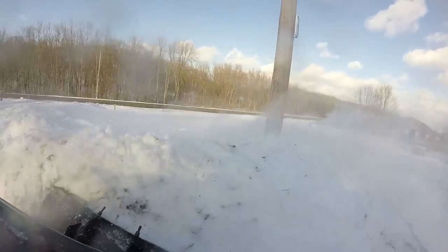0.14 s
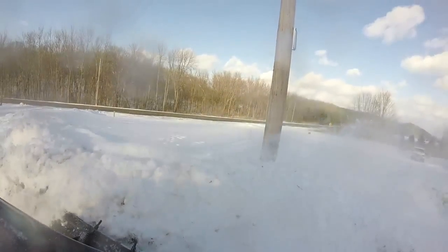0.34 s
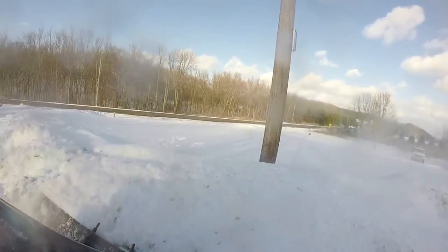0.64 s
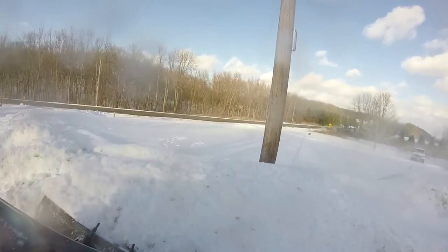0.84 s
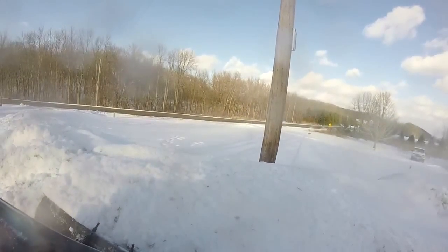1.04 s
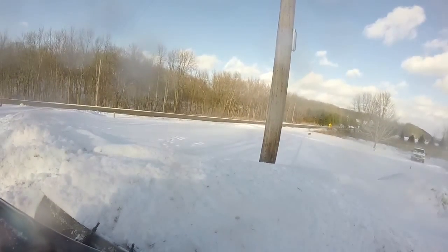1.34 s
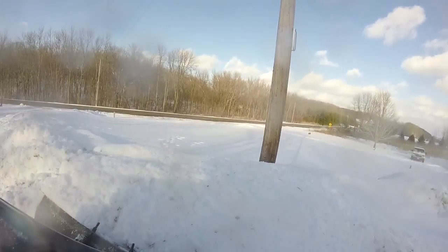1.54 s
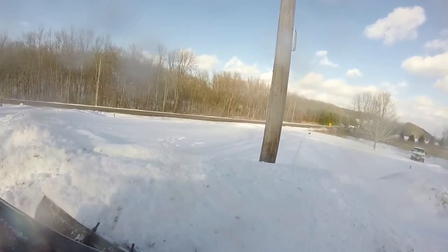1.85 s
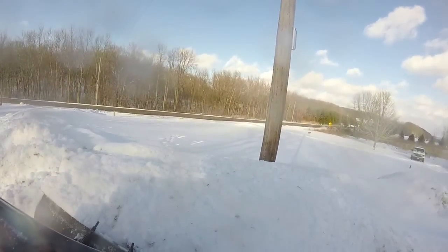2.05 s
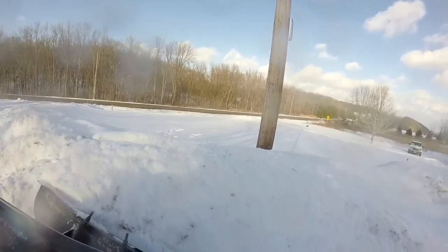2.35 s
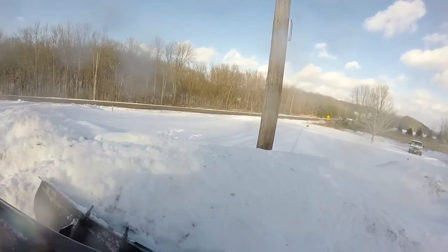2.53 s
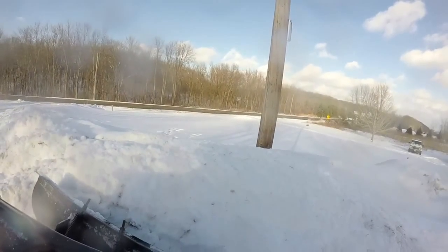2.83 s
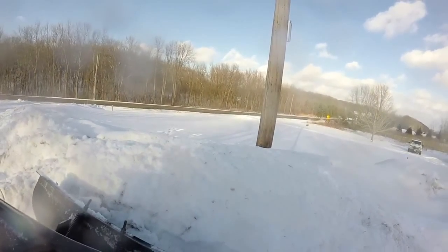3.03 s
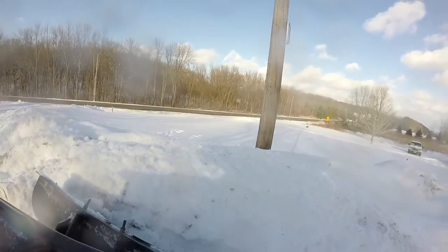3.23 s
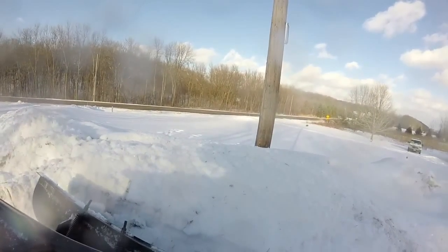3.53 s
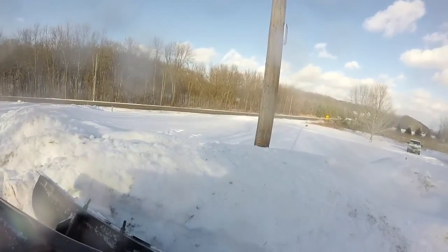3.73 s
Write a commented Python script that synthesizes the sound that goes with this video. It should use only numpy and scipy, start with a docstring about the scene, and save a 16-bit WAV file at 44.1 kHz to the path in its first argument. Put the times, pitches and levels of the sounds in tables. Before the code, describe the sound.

Close to a cased camera on a plow truck outdoors, a short metallic squeal and scrape give way to low engine rumble and small knocks, then a heavy rumbling scrape turns into rough, crackling ice grinding.

```python
"""A steel blade squeals at the end of one push of a plow truck, close to a cased camera on its hood.
The engine, sine orders over noise, sinks toward idle while grit and knocks ring the scuffing blade.
Then the blade bites down with a rumble of the frame and grinds on over icy pavement: random grains
crumble the ice, splinter bursts crack it and short pings chatter as the engine labours and picks up."""
import sys
import numpy as np
from scipy import signal
from scipy.fft import rfft, irfft
from scipy.io import wavfile
from scipy.ndimage import uniform_filter1d, minimum_filter1d

SR = 44100
rng = np.random.default_rng(int(sys.argv[2]) if len(sys.argv) > 2 else 0)


def transcribe(u):
    """Save the signal u as a 16-bit wav file named by the first command-line argument.

    u: samples, shape (n,) or (channels, n), limited to [-1, 1]; the rate is SR.
    q: integer samples, one column per channel.
    """
    v = np.clip(np.atleast_2d(u).T, -1, 1)
    q = np.round(v * 32767).astype(np.int16)
    wavfile.write(sys.argv[1], SR, q)


N = 171108
T = np.arange(N) / SR  # time, s

# All table levels are relative; spectra give the shape only, since each body has unit energy.
# resonances and notches of the camera case: centre_hz [Hz], half_width_hz [Hz], level_db [dB]
CASE_PEAKS = [(2490, 222, 7.5), (2920, 185, -7), (3290, 240, 0.5), (4034, 355, -10), (5630, 290, 6.5),
              (6090, 80, -7.5), (6860, 390, 8), (12900, 850, 17.5)]
# resonances of the steel blade: centre_hz [Hz], half_width_hz [Hz], level_db [dB]
BLADE_PEAKS = [(522, 16, 5), (675, 33, 5), (892, 6.5, 7), (1073, 48, 10), (1430, 94, 10), (1726, 97, 7),
               (2304, 85, -0.5), (2576, 55, 4)]
# spectrum of steel sliding on the ground: frequency_hz [Hz], density_db [dB per Hz]
SLIDE_SPECTRUM = [(100, -24.5), (230, -7.5), (350, -19), (560, 3), (1000, -1.5), (1400, -6), (2200, 2.5),
                  (3300, -8.5), (4700, -15), (6500, -40), (9000, -41.5), (13000, -105.5), (15500, -70)]
# spectrum of ice cracking: frequency_hz [Hz], density_db [dB per Hz]
ICE_SPECTRUM = [(100, -13.5), (350, -24.5), (560, -14), (900, -10.5), (1800, -1.5), (2500, -4.5),
                (3300, -1), (4650, -8.5), (6500, -25), (8000, -34.5), (10000, -40), (13000, -46),
                (15500, -65.5)]


def gain_of(db):
    """Decibels to gain."""
    return 10 ** (np.asarray(db) / 20)


def evened(x):
    """Scales to rms 1."""
    return x / np.sqrt(np.mean(x ** 2) + 1e-20)


def topped(x):
    """Scales the loudest instant, averaged over 64 samples, to rms 1."""
    return x / np.sqrt(uniform_filter1d(x ** 2, size=64).max() + 1e-20)


def curve(rows, axis=1):
    """One column of a timed table, drawn in straight lines to every sample."""
    rows = np.array(rows)
    return np.interp(T, rows[:, 0], rows[:, axis])


def drift(hz):
    """Smooth random motion of rms 1, with little left above the given rate."""
    f = np.fft.rfftfreq(N, 1 / SR)
    smooth = rfft(rng.standard_normal(N)) / (1 + (f / hz) ** 4)
    return evened(irfft(smooth, N))


def colour(x, spectrum, peaks=(), size=8192):
    """Rings x through a causal body of unit energy, made of a smooth spectrum and resonances."""
    f = np.fft.rfftfreq(size, 1 / SR)
    hz, db = np.transpose(spectrum)
    body_db = np.interp(np.log(f + 1), np.log(hz), db)
    body_db = body_db + sum(height * np.exp(-((f - centre) / width) ** 2) for centre, width, height in peaks)
    # minimum phase: the body starts to ring at once
    log_gain = np.log(gain_of(np.r_[body_db, body_db[-2:0:-1]]))
    ring = np.fft.ifft(np.exp(np.conj(signal.hilbert(log_gain)))).real[:size // 2]
    return signal.oaconvolve(x, ring / np.linalg.norm(ring))[:N]


def grains(per_s, spread_db, clump_db):
    """Random clicks of either sign and uneven size, whose size swells in clumps; rms 1."""
    clump_hz = 109
    clumps = clump_db * np.clip(drift(clump_hz), -2, 2)
    size_db = spread_db * np.minimum(rng.exponential(1, N), 3.5) + clumps
    clicks = rng.choice([-1, 1], N) * (rng.random(N) < per_s / SR)
    return evened(gain_of(size_db) * clicks)


def add(mix, s, sound):
    """Mixes a sound in at a time in seconds."""
    part = mix[round(s * SR):][:len(sound)]
    part += sound[:len(part)]


def swell(t, peak_s):
    """Envelope that rises to 1 at peak_s and dies away smoothly."""
    return t / peak_s * np.exp(1 - t / peak_s)


def ping(hz, ring_s):
    """A few cycles of steel that swell and die at once."""
    t = T[:SR // 100]
    return swell(t, ring_s) * np.sin(2 * np.pi * (hz * t + rng.random()))


def blow(rise_s, decay_s):
    """Time and envelope of a blow: a short rise, then a steady decay."""
    t = T[:SR // 5]
    return t, np.minimum(t / rise_s, 1) * np.exp(-np.maximum(t - rise_s, 0) / decay_s)


def engine():
    """Exhaust orders are multiples of the wandering firing rate, over the noise of the running truck."""
    # firing tone: start_s [s], firing_hz [Hz], firing_level_db [dB], octave_level_db [dB]
    firing = [(0, 48, -24, -43), (.25, 44.96, -35.5, -44.5), (.43, 45.04, -24, -45),
              (.756, 39.6, -18, -36.5), (.964, 41.1, -15, -40), (1.1, 38.25, -19, -36),
              (1.3, 38, -19, -35.5), (1.58, 38.4, -12, -38.5), (1.67, 39.36, -25, -29),
              (1.8, 40.67, -30, -25.5), (2.15, 42.45, -22.5, -35), (2.274, 50, -34, -37),
              (2.458, 43.04, -30.5, -29), (2.626, 41.82, -19, -20.5), (2.852, 48.74, -34.5, -36.5),
              (3.05, 51.1, -31.5, -30), (3.21, 42.8, -25.5, -31.5), (3.31, 43.16, -18, -25),
              (3.55, 50.27, -30.5, -28.5), (3.7, 55.36, -39, -32.5), (3.88, 66.3, -16, -35)]
    # higher engine orders: multiple [of the firing rate], level_db [dB against the octave]
    overtones = [(1.5, -8.5), (2.5, -15.5), (3, -10.5), (4, -19), (5, -30.5), (6, -29), (7, -39)]
    # level of the higher orders as the engine strains: start_s [s], level_db [dB]
    strain = [(0, -1.5), (1.55, -0.5), (2.2, 0), (2.5, -1.5), (2.78, -4), (2.95, -4.5), (3.6, -4),
              (3.88, -2)]
    # spectrum of the truck noise: frequency_hz [Hz], density_db [dB per Hz]
    motor_spectrum = [(20, -8.5), (45, 10.5), (90, -2.5), (150, -9), (250, -11), (360, -31.5), (700, -18),
                      (1050, -22), (1300, -26.5), (1900, -20.5), (2500, -43.5), (3300, -42.5),
                      (6000, -61.5), (14000, -86.5)]
    # truck noise: start_s [s], level_db [dB]
    motor_level = [(0, -29.5), (.5, -45.5), (.75, -40.5), (1.1, -39), (1.55, -35), (3.88, -50.5)]
    wander, tone_flutter_db, order_flutter_db, noise_flutter_db = 0.018, 0.03, 4.1, 2.3  # rms

    firing_hz = curve(firing) * (1 + wander * drift(16.5))
    phase = 2 * np.pi * np.cumsum(firing_hz) / SR
    upper = np.sin(2 * phase)
    for multiple, db in overtones:
        level_db = db + curve(strain) + order_flutter_db * drift(12)
        order = round(2 * multiple) / 2  # whole and half orders
        upper = upper + gain_of(level_db) * np.sin(order * phase + 2 * np.pi * rng.random())
    tone = gain_of(curve(firing, axis=2)) * np.sin(phase) + gain_of(curve(firing, axis=3)) * upper
    tone *= gain_of(tone_flutter_db * drift(10))

    pulsed = rng.standard_normal(N) * (1 + 0.16 * np.sin(phase))
    noise = evened(colour(pulsed, motor_spectrum, CASE_PEAKS))
    return tone + noise * gain_of(curve(motor_level) + noise_flutter_db * drift(23))


def specks():
    """Thrown ice ticks on the camera case: single clicks ring its resonances."""
    # ticks: start_s [s], level_db [dB]
    ticks = [(.541, -31), (.571, -37), (.614, -35), (.648, -33.5), (.803, -28), (1.229, -26)]
    # spectrum of a tick: frequency_hz [Hz], density_db [dB per Hz]
    tick_spectrum = [(300, -30), (2000, 11), (4500, 8), (8000, -12), (13000, -22), (16000, -37.5)]
    clicks = np.zeros(N)
    for start, db in ticks:
        add(clicks, start, gain_of([db]))
    return colour(clicks, tick_spectrum, CASE_PEAKS)


def squeal(path, partials, rasp_db):
    """Steel sticks and slips at an unsteady pitch, with a puff of rasp at every slip."""
    # spectrum of the rasp: frequency_hz [Hz], density_db [dB per Hz]
    rasp_spectrum = [(300, -18.5), (600, -13), (2200, 9.5), (3300, -7.5), (5000, -10.5), (7500, -19),
                     (11000, -26), (13000, -42.5), (16000, -56)]
    jitter, flutter_db = 0.013, 1.5  # rms, of the pitch and of each partial
    phase = 2 * np.pi * np.cumsum(curve(path) * (1 + jitter * drift(140))) / SR
    tone = np.zeros(N)
    for multiple, db in enumerate(partials, start=1):
        tone += gain_of(db + flutter_db * drift(110)) * np.sin(multiple * phase)
    rasp = evened(colour(rng.standard_normal(N) * (1 + np.cos(phase)), rasp_spectrum))
    fade_out = np.clip((path[-1][0] - T) / .005, 0, 1)
    return (tone + gain_of(rasp_db) * rasp) * gain_of(curve(path, axis=2)) * fade_out


def squeals():
    """The blade squeals low and high by stick-slip, then squeaks faintly as the truck creeps on."""
    # low squeal: start_s [s], pitch_hz [Hz], level_db [dB]
    low = [(0, 545, -21.5), (.012, 530, -51), (.035, 551.5, -24), (.06, 528.6, -53), (.105, 542.7, -30.5),
           (.132, 559, -16), (.15, 545, -13), (.18, 556.4, -20.5), (.198, 547, -36.5), (.225, 541.5, -23.5),
           (.237, 564, -34), (.245, 550, -41), (.275, 550, -49)]
    # high squeal: start_s [s], pitch_hz [Hz], level_db [dB]
    high = [(0, 1900, -23.5), (.025, 1900, -32), (.04, 1850, -23), (.06, 1900, -19.5), (.078, 1870, -39)]
    # faint squeak of the creeping truck: start_s [s], pitch_hz [Hz], level_db [dB]
    creep = [(1.05, 1897, -71), (1.09, 1880, -65), (1.14, 1866, -79), (1.21, 1850, -50), (1.29, 1820, -50),
             (1.35, 1875, -64), (1.41, 1840, -48.5), (1.46, 1893, -63), (1.5, 1915, -49), (1.59, 1850, -60)]
    # partials of the low squeal, from the first up: level_db [dB]
    low_partials = [0, -7.5, -8, -16, -27, -18, -22]
    # partials of the high squeal and the squeak, from the first up: level_db [dB]
    high_partials = [0, -26, -46]
    push_end = squeal(low, low_partials, rasp_db=-10) + squeal(high, high_partials, rasp_db=-21)
    squeak = squeal(creep, high_partials, rasp_db=-25.5) * gain_of(4.5 * drift(19))
    return push_end + squeak


def scuffs():
    """Force of the brief touches of the blade: attack, hold, release and a weak rattle after."""
    # touches: start_s [s], length_s [s], level_db [dB]
    touches = [(0.3, 0.0087, -40), (0.357, 0.016, -41.5), (0.57, 0.0067, -49), (0.797, 0.027, -42),
               (0.873, 0.044, -43), (0.923, 0.027, -20.5), (0.964, 0.025, -17.5), (1.226, 0.012, -35)]
    attack_s, release_s, rattle_s, rattle_db = 0.0025, 0.0054, 0.029, -21.5
    force = np.zeros(N)
    for start, length, db in touches:
        after = np.maximum(T - start - length, 0)
        fall = np.exp(-after / release_s) + gain_of(rattle_db) * np.exp(-after / rattle_s)
        force += gain_of(db) * np.clip((T - start) / attack_s, 0, 1) * fall
    return force


def scrape():
    """Dense grit rings the blade while the drag and the brief touches shake the plow frame."""
    # blade dragging on the ground: start_s [s], sliding_level_db [dB], rumble_level_db [dB]
    drag = [(0, -35, -43), (.065, -30, -23), (.085, -16.5, -18.5), (.15, -19.5, -26), (.2, -28, -49),
            (.25, -46, -42), (.33, -72, -58.5), (.45, -75, -71.5), (1.594, -56, -71.5), (1.601, -17, -15),
            (1.7, -14.5, -17.5), (1.79, -18, -17), (1.99, -20.5, -22.5), (2.06, -19, -13.5),
            (2.2, -24, -33), (2.45, -26.5, -34.5), (2.75, -21.5, -18.5), (2.92, -29, -31.5),
            (3.03, -23.5, -43), (3.16, -40, -46), (3.215, -42, -34), (3.27, -23, -34), (3.335, -37, -25),
            (3.38, -28.5, -35), (3.55, -35.5, -40), (3.7, -18.5, -54), (3.77, -37, -29), (3.88, -27, -27.5)]
    # spectrum of the shaking frame: frequency_hz [Hz], density_db [dB per Hz]
    frame_spectrum = [(20, -19), (35, 5.5), (60, -3), (85, 3.5), (125, 0), (150, -13), (230, -12.5),
                      (340, -36), (700, -59), (2000, -83.5)]
    thump_db = 1.5  # frame shake against the force of a touch
    touch = scuffs()
    grit = grains(per_s=7000, spread_db=3.5, clump_db=3.5) * gain_of(curve(drag))
    knocks = grains(per_s=3500, spread_db=2, clump_db=2) * touch
    shake = evened(colour(rng.standard_normal(N), frame_spectrum))
    shake *= gain_of(curve(drag, axis=2)) + gain_of(thump_db) * touch
    return colour(grit + knocks, SLIDE_SPECTRUM, BLADE_PEAKS + CASE_PEAKS) + shake


def bumps():
    """Bumps in the ground clank the blade with a spray of grit and thud the frame."""
    # blade clanks: start_s [s], level_db [dB], pitch_hz [Hz], decay_s [s]
    clanks = [(.0972, -7.5, 2500, .002), (.356, -32.5, 818, 0.011), (0.5393, -30.5, 2556, 0.0045),
              (0.9802, -9, 2258, 0.0027), (1.7145, -11, 2410, 0.0037), (1.78, -9, 2500, 0.0042),
              (1.8981, -6, 2515, 0.0052)]
    # frame thuds as the blade digs in: start_s [s], level_db [dB], pitch_hz [Hz]
    thuds = [(1.602, -14, 70.15), (1.668, -13, 74.6), (1.695, -12, 112), (1.768, -16.5, 118),
             (2.08, -15, 127.5)]
    grit_db = -6.5  # against the clank tone
    out = np.zeros(N)
    for start, db, hz, decay_s in clanks:
        t, force = blow(0.00091, decay_s)
        spray = force * rng.standard_normal(len(t))
        grit = topped(colour(spray, SLIDE_SPECTRUM, BLADE_PEAKS + CASE_PEAKS, size=2048))[:len(t)]
        add(out, start, gain_of(db) * (force * np.sin(2 * np.pi * hz * t) + gain_of(grit_db) * grit))
    for start, db, hz in thuds:
        t, force = blow(rise_s=0.0037, decay_s=0.028)
        add(out, start, gain_of(db) * force * np.sin(2 * np.pi * hz * t))
    return out


def slips():
    """The edge catches and lets go at an uneven rate: a burst of force, then a lull."""
    rate_hz, jitter, depth_db, spread_db = 115, .4, 14.5, 3.5
    turns = np.cumsum(rate_hz * np.exp(jitter * drift(69.8))) / SR
    size_db = spread_db * np.clip(rng.standard_normal(N), -2, 1)[turns.astype(int)]  # one size a slip
    burst_db = depth_db * np.sin(np.pi * np.sqrt(turns % 1))  # peaks early in each slip
    return evened(gain_of(size_db + burst_db))


def ice():
    """Ice crumbles in fine clicks under the slipping edge, and chips break off with a short ring."""
    # ice crushed under the cutting edge: start_s [s], level_db [dB]
    crush = [(.07, -45), (.115, -15), (.16, -21.5), (.19, -40), (.31, -53.5), (.42, -76), (1.6, -66.5),
             (1.63, -37), (1.79, -23), (1.9, -20), (2, -30), (2.04, -18), (2.12, -27), (2.19, -16),
             (2.39, -16), (2.51, -20.5), (2.63, -23), (2.76, -16), (2.93, -19), (3, -15.5), (3.15, -16.5),
             (3.18, -28), (3.205, -69), (3.23, -44), (3.255, -18), (3.3, -25), (3.338, -38), (3.36, -15),
             (3.46, -18.5), (3.6, -14.5), (3.71, -14.5), (3.8, -21), (3.86, -19.5)]
    # chips that break off between the cracks: pitch_hz [Hz], level_db [dB]
    chip_pitches = [(1400, -2), (1900, 0.5), (2400, 0.5), (3200, 1), (4800, -18)]
    crumb_db, chip_db, chip_ring_s = -5, -11.5, 0.00028
    crumbs = grains(per_s=4000, spread_db=3.5, clump_db=3) * slips()
    crumbs = colour(crumbs, ICE_SPECTRUM, CASE_PEAKS + [(13000, 2200, -8)])  # a dip in the top treble
    chips = np.zeros(N)
    for hz, db in chip_pitches:
        breaks = grains(per_s=50, spread_db=-4.5, clump_db=3)
        rings = signal.oaconvolve(breaks, ping(hz, chip_ring_s))[:N]
        chips += gain_of(db) * evened(colour(rings, ICE_SPECTRUM, CASE_PEAKS))
    return (gain_of(crumb_db) * crumbs + gain_of(chip_db) * chips) * gain_of(curve(crush))


def cracks():
    """The edge snaps free: a burst of splinters and a short ring near one of two pitches, at random."""
    # large cracks: start_s [s], strength_db [dB]
    snaps = [(0.0745, -10.5), (2.1049, -8), (2.1276, -8.5), (2.1523, 1), (2.1837, -2), (2.2044, -5),
             (2.2658, -13.5), (2.3367, -11.5), (2.3539, -11.5), (2.3807, -11.5), (2.3976, -7),
             (2.4185, -10.5), (2.4652, -15), (2.4799, -13.5), (2.487, -13), (2.6958, -9.5), (2.7073, -15),
             (2.7273, -14), (2.7517, -2.5), (2.7743, -9.5), (2.8164, -4), (2.8383, -10.5), (2.8492, -7),
             (2.8586, -5), (2.8987, -5), (2.9386, -9), (2.961, -9.5), (2.9717, -7), (2.9803, -10),
             (2.997, -9), (3.0203, -14), (3.0409, -9.5), (3.0475, -8.5), (3.0598, -17), (3.0701, -5),
             (3.086, -8), (3.1209, 2), (3.1413, -12), (3.1618, -11.5), (3.186, -13), (3.2353, -20),
             (3.259, -12.5), (3.2715, -15), (3.2806, -29), (3.2898, -16), (3.2959, -14.5), (3.3309, -17),
             (3.349, -5.5), (3.369, -5), (3.398, -11), (3.4484, -16), (3.4662, -11), (3.4764, -8),
             (3.498, -3), (3.5218, -9), (3.5291, -10), (3.5606, -7), (3.5717, -17), (3.5796, -5),
             (3.5909, -12), (3.5991, -13), (3.6112, -12), (3.6249, 0), (3.659, -8), (3.6882, -10),
             (3.7079, -6), (3.7185, -15.5), (3.7426, -14.5), (3.8303, -9.5), (3.8404, -10), (3.8567, -9.5),
             (3.8633, -7.5)]
    lag_s, burst_db, ring_db, ring_s = .0001, -2, -0.5, 0.00068
    splinter_s, splinter_share, splinters_per_s = 0.0019, 0.36, 14000
    out, t = np.zeros(N), T[:SR // 40]
    force = swell(t, ring_s) + splinter_share * np.exp(-t / splinter_s)
    for start, db in snaps:
        hz = rng.choice([2400, 3330]) * rng.uniform(0.992, 1.065)
        splinters = rng.choice([-1, 1], len(t)) * (rng.random(len(t)) < splinters_per_s / SR)
        burst = topped(colour(force * splinters, ICE_SPECTRUM, CASE_PEAKS, size=2048))
        add(out, start + lag_s, gain_of(db + burst_db) * burst)
        add(out, start + lag_s, gain_of(db + ring_db) * ping(hz, ring_s))
    return out


def scene():
    """Engine, blade and ice at one microphone."""
    tonal = np.sqrt(2) * (engine() + squeals())  # raises the engine and the squeals by 3 dB
    return (tonal + specks() + scrape() + bumps() + ice() + cracks())[None]


def record(dry):
    """A fast limiter holds the peaks under the ceiling, then a low-pass filter limits the band."""
    ceiling, limiter_s, edge_hz = 1, .001, 15200
    size = 2 * round(limiter_s * SR / 2) + 1
    gain = minimum_filter1d(ceiling / np.maximum(abs(dry), ceiling), 2 * size)
    held = dry * uniform_filter1d(uniform_filter1d(gain, size), size)
    low_pass = signal.firwin(255, edge_hz, window=("kaiser", 9), fs=SR)
    return signal.oaconvolve(held, low_pass[None], "same")


dry = scene()
out = record(dry)
transcribe(out)
```